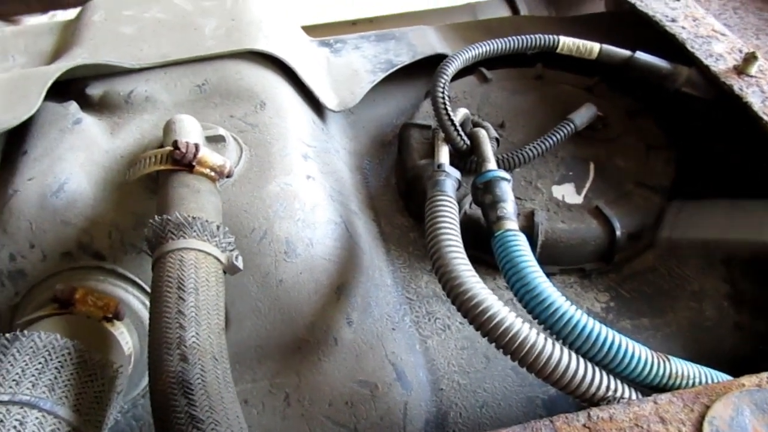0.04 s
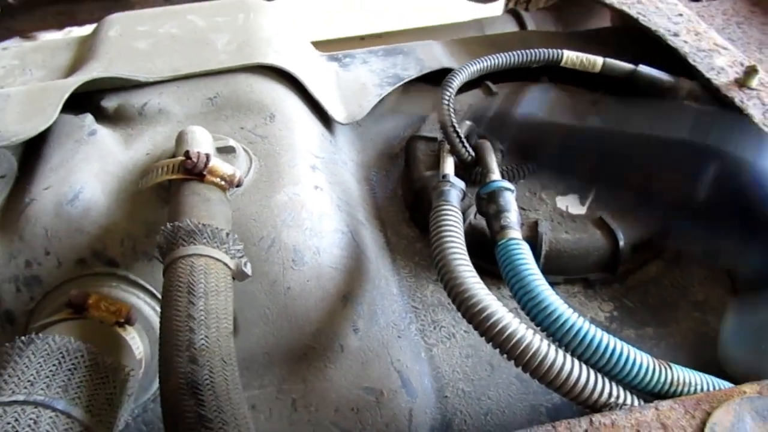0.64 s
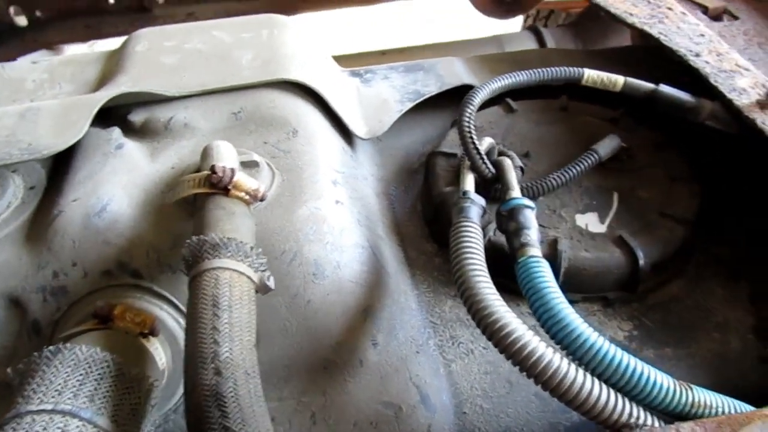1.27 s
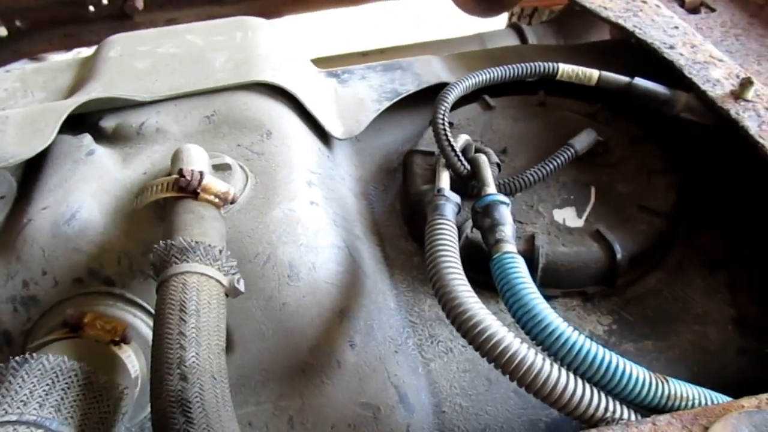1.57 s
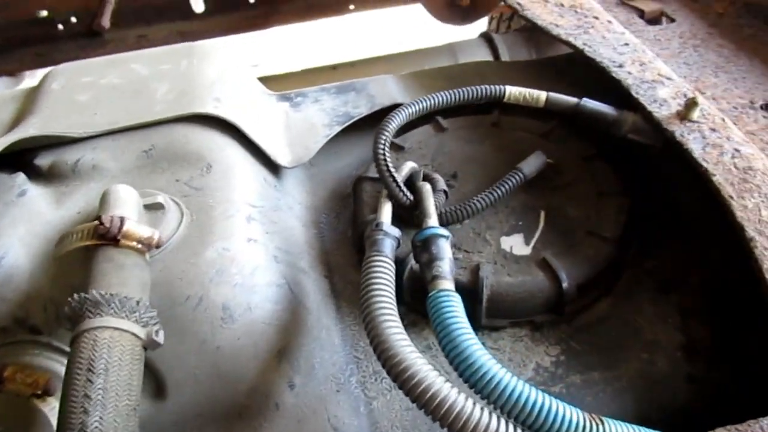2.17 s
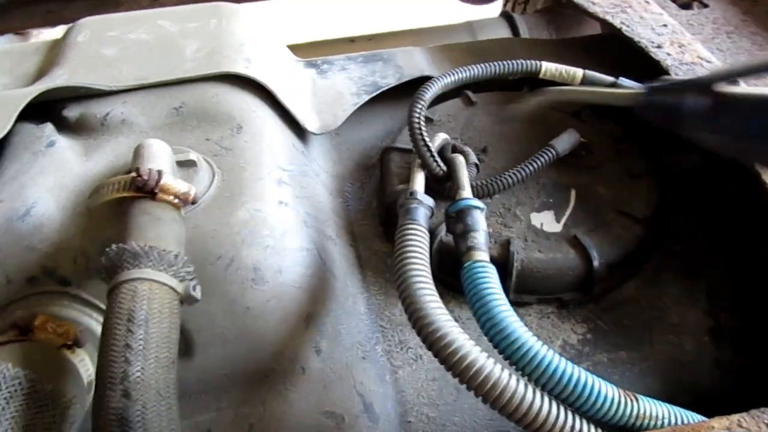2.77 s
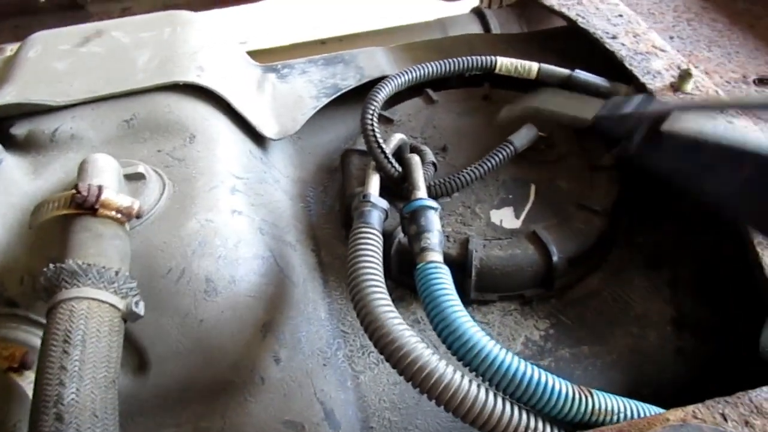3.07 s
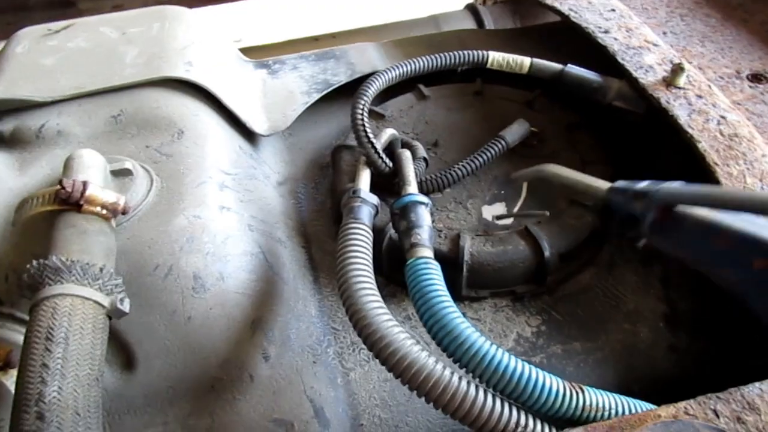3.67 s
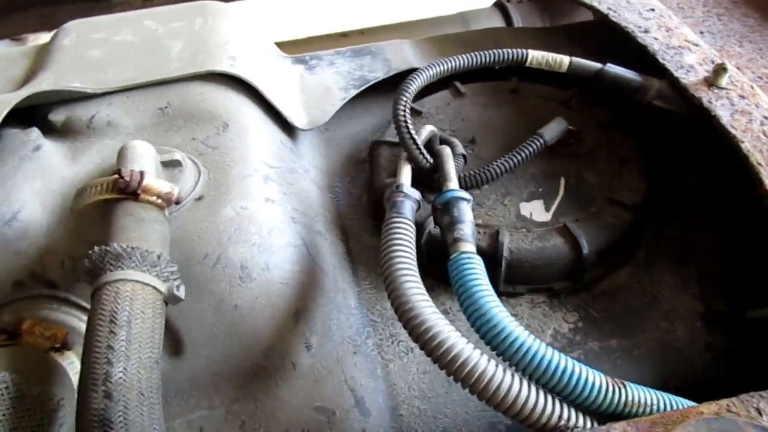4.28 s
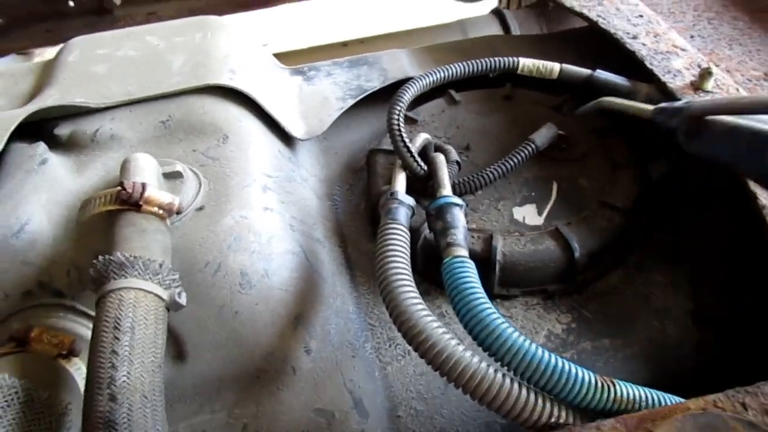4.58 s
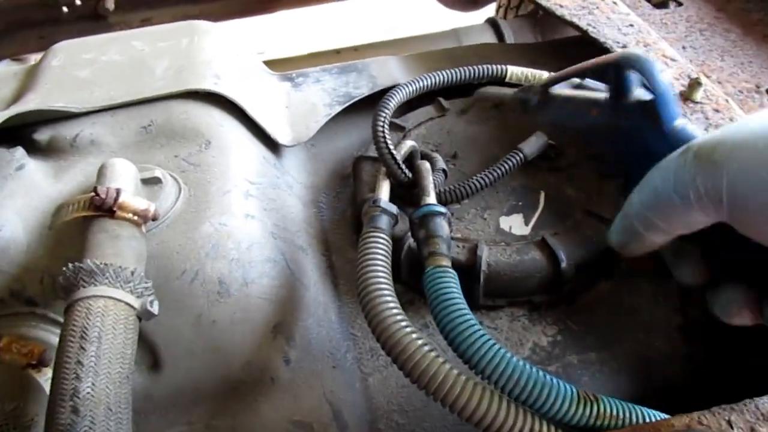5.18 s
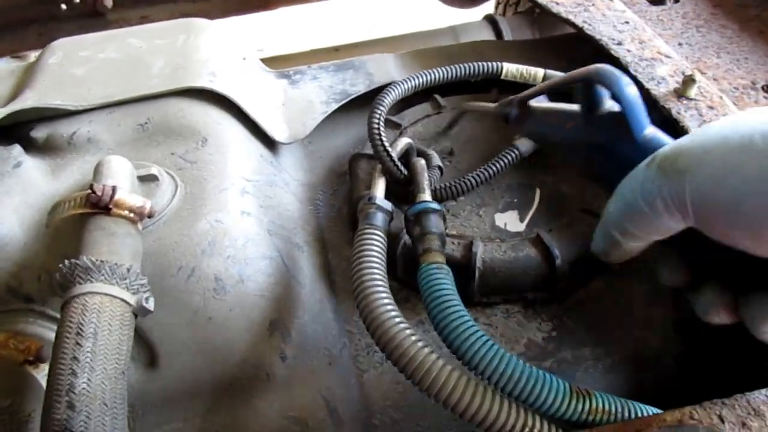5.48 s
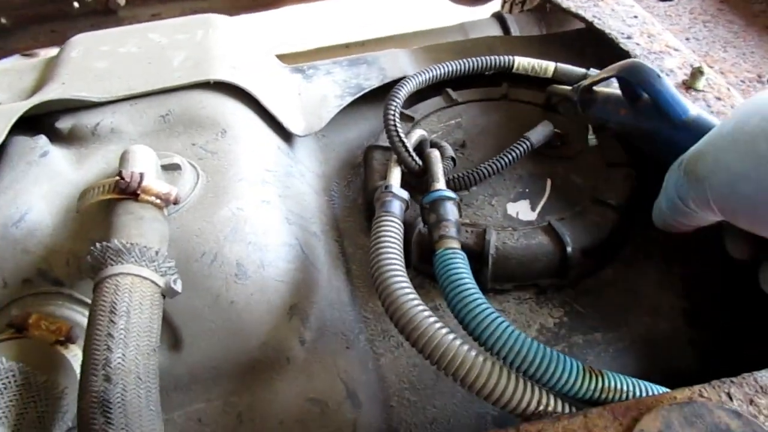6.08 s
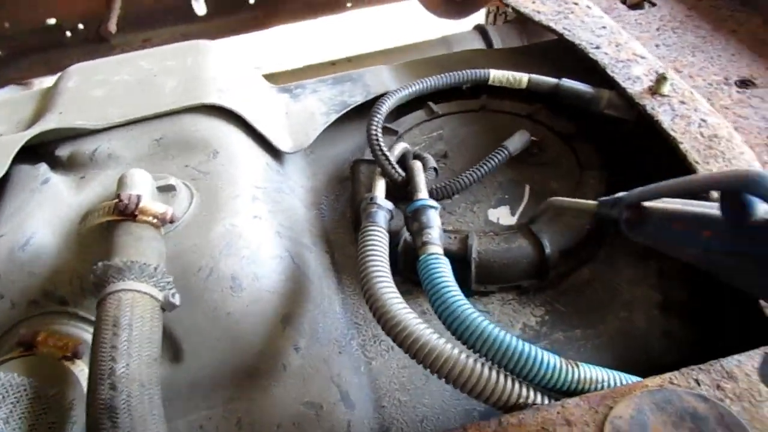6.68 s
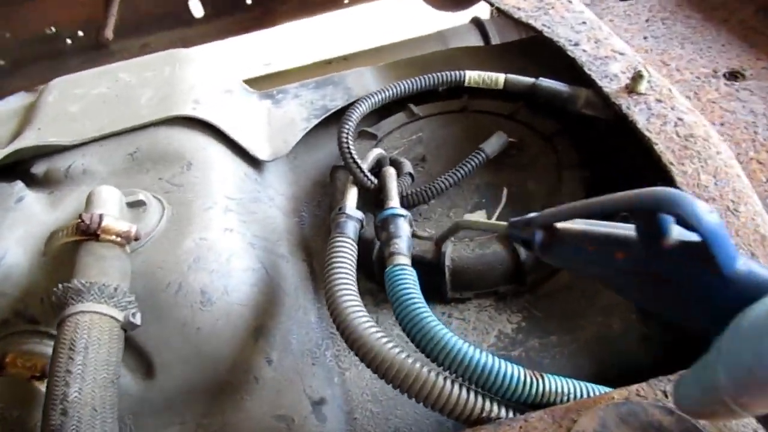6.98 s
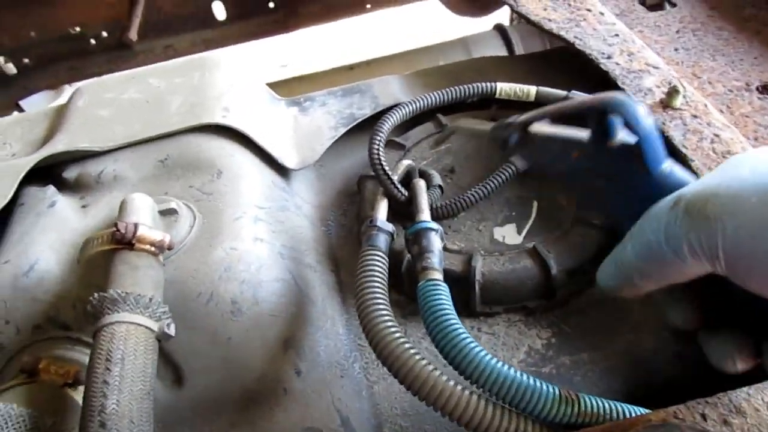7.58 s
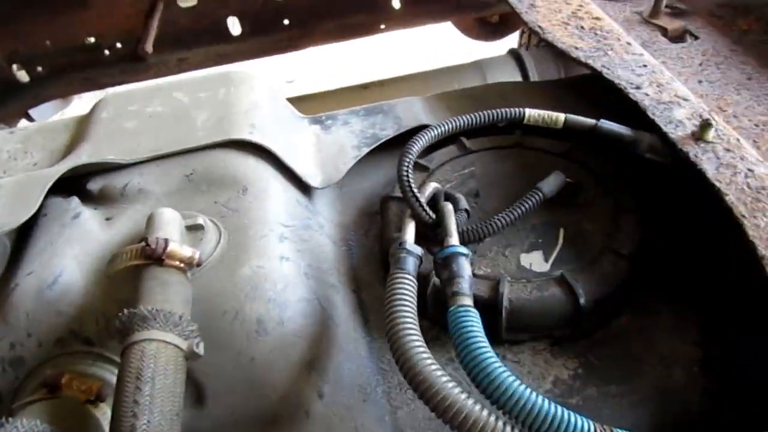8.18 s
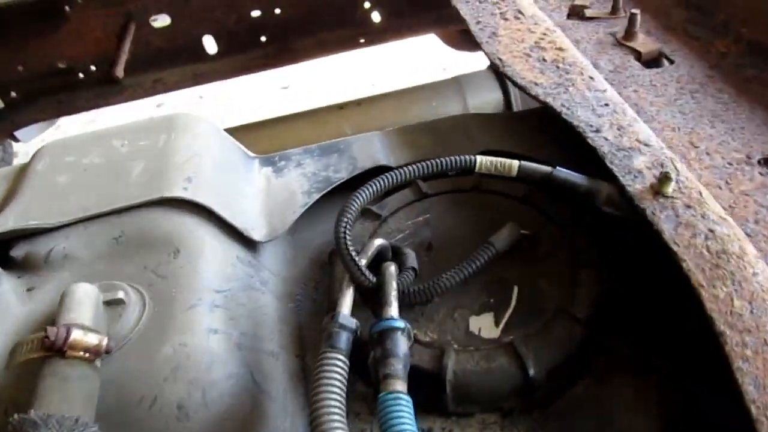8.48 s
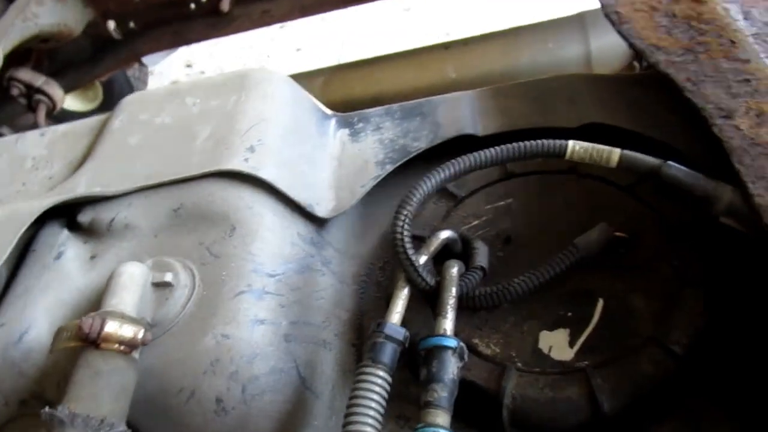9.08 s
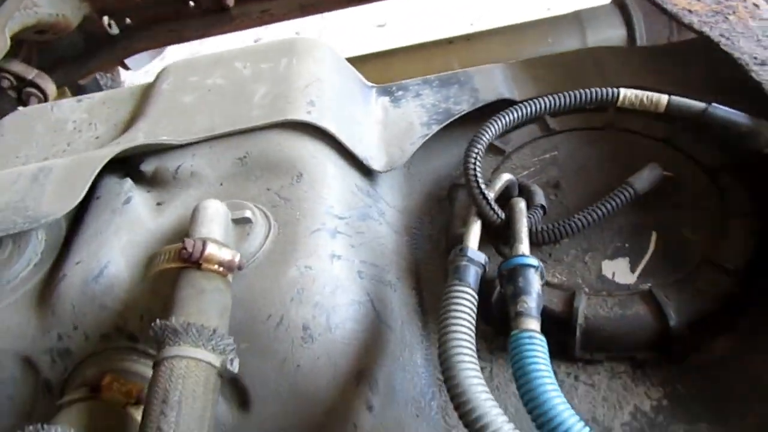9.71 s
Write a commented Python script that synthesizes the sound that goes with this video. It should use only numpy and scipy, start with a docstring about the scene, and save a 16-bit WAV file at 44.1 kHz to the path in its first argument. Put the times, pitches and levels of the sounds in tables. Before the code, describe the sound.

A compressed air blow gun cleans a fuel tank in a garage, close up and in mono. A brief spit of air opens, followed by full-bodied blasts from 0.2 to 1.2 seconds, 1.4 to 1.9, and 2.1 to 2.3. After a blink of silence, a brighter hiss runs from 2.4 to 4.2 seconds, fluttering quickly around 3.2 as the jet is shaken over a hose. The longest blast lasts from 4.3 to 8.6 seconds, wavering, flaring on edges and roaring in hollows, with surges near 8 seconds. Breathy howls come and go as air crosses openings, and loosened grit ticks faintly. Two short, sharp blasts follow between 8.7 and 9.3 seconds, and a last one from 9.5 to about 10. A few soft puffs of stray air touch the microphone. Each blast dies away quickly over a very faint low room rumble.

```python
"""Blow gun on a fuel tank

Compressed air cleans a tank top and its pump recess in a garage, close up and in mono: four blasts, a
blink of silence, then five from a second position. The jet hisses, splashes on the surface, roars in
hollows and buffets the tank. It flares on ribs and hoses, howls across openings and throws grit,
and each blast dies away in the room."""
import sys
import numpy as np
from scipy import signal
from scipy.fft import rfft, irfft, next_fast_len
from scipy.io import wavfile

SR = 44100
rng = np.random.default_rng(int(sys.argv[2]) if len(sys.argv) > 2 else 0)


def store_pcm(level_fs):
    """Save levels as 16-bit WAV."""
    pcm = np.round(np.clip(level_fs, -1, 1) * 32767).astype(np.int16)
    wavfile.write(sys.argv[1], SR, np.atleast_2d(pcm).T)


N = 434385
T = np.arange(N) / SR
FFT_SIZE = next_fast_len(N, True)
HZ = np.maximum(np.arange(FFT_SIZE // 2 + 1) * SR / FFT_SIZE, 1)

# trigger pulls: (valve opens [s], valve shuts [s], buffet [dB], roar [dB], splash [dB], hiss [dB])
TRIGGER_PULLS = [(-0.03, 0.039, -26.5, -19, -22, -17), (0.232, 1.244, -33, -26.5, -24, -21.5),
                 (1.441, 1.879, -38, -39, -29, -20), (2.064, 2.287, -29.5, -25.5, -25, -20.5),
                 (2.365, 4.203, -46.5, -40.5, -29, -24.5), (4.301, 8.585, -49.5, -42, -33.0, -26),
                 (8.675, 8.909, -48, -40.5, -29.5, -29), (8.947, 9.271, -48, -44.5, -34.5, -31.5),
                 (9.514, 9.984, -47, -35.5, -26.5, -25.5)]
BUFFET_PER_ROAR = 0.49  # dB of buffeting gained for each dB of roar


def undb(db):
    """Decibels to gain."""
    return 10 ** (np.asarray(db) / 20)


def unit(x):
    """Scale to an rms of one."""
    return x / np.sqrt(np.mean(x ** 2))


def colour(points, bells=()):
    """An EQ curve with resonant peaks and dips on top, as a gain for each frequency."""
    hz, db = np.transpose(points)
    curve_db = np.interp(np.log(HZ), np.log(hz), db)
    bells_db = sum(peak / (1 + (2 * (HZ - centre) / width) ** 2) for centre, width, peak in bells)
    return undb(curve_db + bells_db)


def noise(gain):
    """Noise shaped by a gain for each frequency, at unit rms."""
    spectrum = rng.standard_normal(2 * len(HZ)).view(complex)
    return unit(irfft(spectrum * gain, FFT_SIZE)[:N])


def wander(rate_hz):
    """Smooth random motion of unit spread, up to about rate_hz."""
    spectrum = np.fft.fft(rng.standard_normal(4096))
    hz = np.fft.fftfreq(len(spectrum), T[-1] / len(spectrum))
    slow = np.fft.ifft(spectrum / (1 + (hz / rate_hz) ** 4)).real
    return np.interp(T, np.linspace(0, T[-1], len(slow)), unit(slow))


def swell(at, length):
    """A rounded envelope centred on a moment, one at its top."""
    distance = np.abs(2 * (T - at) / length)
    near = distance < 2
    bump = np.zeros(N)
    bump[near] = np.exp(-distance[near] ** 3)
    return bump


def valve(opening_s, closing_s):
    """Air flow builds as the trigger is squeezed and drains from the nozzle on release."""
    flow = np.zeros(N)
    for opens, shuts, *_ in TRIGGER_PULLS:
        attack = 1 - np.exp(-(np.maximum(T - opens, 0) / opening_s) ** 2)
        release = np.exp(-np.clip((T - shuts) / closing_s, 0, 20))
        flow += attack * release
    return flow


def blast_levels():
    """Buffet, roar, splash and hiss in dB: each blast has its own balance, and the long ones drift."""
    # level rides, one curve for each long blast: (time [s], roar [dB], splash [dB], hiss [dB])
    drifts = [
        [(0.322, 3.5, 1.5, 4), (0.431, -1.5, 0.5, 5), (0.521, 11.5, 2.0, -1.5), (0.756, -4, -4, 2.5),
         (0.875, 3.5, -0.5, -2), (1.056, -2, 1, 5), (1.256, -3.0, -3, -2.5)],
        [(2.392, 2, 2.5, 1), (2.476, 2.5, 0.5, 0.5), (2.511, 9, 8, -5), (2.816, -1, -2.5, -1.5),
         (3.25, 2.5, 3.0, 3), (3.361, -6.5, -4, 1.0), (3.722, -2, -4, 5.5), (3.827, 2, -4.5, 2),
         (4.215, -6, -6, 1.5)],
        [(4.337, -6.5, -2, 0.5), (4.579, 3.5, 0, 5.5), (4.814, 5.0, 1, -2.0), (5.013, 5.5, 4.5, 4.0),
         (5.294, 1.5, -2.5, -2.5), (5.448, 8.5, 5, -2.5), (6.103, 8, 1.5, 2.0), (6.607, -6.5, -6.0, -5),
         (6.813, -2.5, 0, 6), (6.881, -5.5, -3.5, 1.5), (7.209, -7.5, 1.0, 1), (7.325, -14, -8, 5),
         (7.654, 2.5, 6, 2.5), (7.884, 0.5, -2.5, -8), (8.528, 4, 0.5, -3.5)],
    ]
    pulls = np.array(TRIGGER_PULLS)
    current_pull = np.searchsorted(pulls[1:, 0], T)
    levels = pulls[current_pull, 2:].T
    for curve in drifts:
        times, *rides = np.transpose(curve)
        during = current_pull == np.searchsorted(pulls[1:, 0], times.mean())
        roar, splash, hiss = (np.interp(T[during], times, ride) for ride in rides)
        levels[:, during] += [BUFFET_PER_ROAR * roar, roar, splash, hiss]
    return levels


def aim(roar_per_splash=0.38, splash_per_roar=0.47, tremor_hz=11, tremor_db=1.0):
    """Swings in dB as the jet roams: edges make it splash and hiss, hollows make it roar and buffet."""
    # the jet flares on a rib or hose, or misses the surface and dips:
    # (centre [s], length [s], splash rise [dB], hiss rise [dB])
    edges = [(0.31, 0.05, 1, 1.5), (0.8, 0.033, 11.5, 1.5), (1.192, 0.032, 12, 3.5), (2.463, 0.042, 3, 5.5),
             (2.672, 0.068, 5, 3.5), (2.783, 0.016, 10, 13), (2.824, 0.014, -1, 11), (2.85, 0.014, 4, 5.0),
             (2.887, 0.023, 6.5, 8.5), (2.922, 0.018, 3.5, 5), (2.993, 0.032, -4, 7),
             (3.034, 0.018, 5.5, 7), (3.351, 0.032, -2, 11.5), (3.477, 0.098, 7, 1.5), (3.65, 0.041, -1, 2),
             (3.746, 0.032, 2, 4.5), (4.165, 0.042, -2, 3.0), (4.381, 0.098, 10, 0.5),
             (4.495, 0.015, 3.5, 10), (5.01, 0.045, 4.5, 1.0), (5.103, 0.034, 2.5, 1.0),
             (5.465, 0.036, 3, -2), (5.57, 0.04, 0, 3), (5.71, 0.036, -5, -1), (6.545, 0.026, 0.5, 5),
             (6.97, 0.02, -1.5, -4.0), (7.11, 0.035, -6, -4), (7.274, 0.058, 3.5, 3.5),
             (7.39, 0.043, 8.5, 3.5), (7.53, 0.051, 0.5, 6.5), (7.764, 0.063, 2, 12), (7.9, 0.057, 6, -3),
             (7.997, 0.044, 11.5, 3), (8.116, 0.045, 12.0, 2), (8.158, 0.058, 3, 6), (8.32, 0.035, -5, -4),
             (8.885, 0.21, 2.5, 8), (9.037, 0.13, 11, 13), (9.165, 0.079, 14.0, 16.5), (9.53, 0.02, 5.5, 3),
             (9.606, 0.042, 5.5, 10), (9.642, 0.018, -9, -5.0), (9.655, 0.011, 4.5, 3),
             (9.707, 0.15, 5.0, 3.5)]
    # the jet dips into a hollow: (centre [s], length [s], roar rise [dB])
    hollows = [(1.005, 0.055, 4), (1.5, 0.13, 17), (1.843, 0.085, 14.5), (2.144, 0.065, 6.5),
               (2.714, 0.065, 9.5), (2.833, 0.072, 13.5), (2.99, 0.041, 14), (3.07, 0.053, 7.5),
               (3.359, 0.05, 9), (3.581, 0.057, 12), (4.027, 0.14, 8.0), (4.484, 0.12, 10.5),
               (4.822, 0.065, 2.5), (5.336, 0.064, 5.5), (5.779, 0.05, 3.5), (5.958, 0.045, 4),
               (6.091, 0.07, 2), (6.562, 0.068, 10), (6.866, 0.012, 10.5), (7.029, 0.056, 7.5),
               (7.336, 0.068, 18), (8.02, 0.07, 11), (8.108, 0.062, 14.5), (8.167, 0.053, 18),
               (9.233, 0.09, 6), (9.532, 0.038, 8.5)]
    roar, splash, hiss = shake()
    for at, length, splash_db, hiss_db in edges:
        on_edge = swell(at, length)
        roar += roar_per_splash * splash_db * on_edge
        splash += splash_db * on_edge
        hiss += hiss_db * on_edge
    hollow_db = sum(rise_db * swell(at, length) for at, length, rise_db in hollows)
    hollow_db += tremor_db * wander(tremor_hz)  # the unsteady hand makes the roar waver
    roar += hollow_db
    splash += splash_per_roar * hollow_db
    return np.array([BUFFET_PER_ROAR * roar, roar, splash, hiss])


def eddy_bands(crossovers_hz=(650, 2100, 7500)):
    """Shares of the spectrum for four sizes of eddy, largest first; their powers add to one."""
    below = [1 / (1 + (HZ / hz) ** order) for hz, order in zip(crossovers_hz, (12, 10, 8))]
    powers = np.diff([np.zeros_like(HZ), *below, np.ones_like(HZ)], axis=0)
    return np.sqrt(np.abs(powers))


def turbulence(gain, lag, flutter_db, flutter_hz, reflection=0.22):
    """Eddies come in uneven gusts and are heard again, lag samples later, off the tank."""
    eddies = noise(gain)
    reflected = eddies[np.arange(N) - np.round(lag).astype(int)]
    gusts = undb(flutter_db * wander(flutter_hz))
    return unit((eddies + reflection * reflected) * gusts)


def grit(gain, per_second=45, scatter_db=4, low_cut_hz=1800):
    """Loosened dirt ticks against the tank: many faint grains, a few sharp ones."""
    hits = rng.random(N) < per_second / SR
    sizes = undb(scatter_db * np.minimum(rng.exponential(size=N), 3.5))
    spectrum = rfft(hits * sizes, FFT_SIZE) * gain * HZ / (HZ + low_cut_hz)
    return unit(irfft(spectrum, FFT_SIZE)[:N])


def jet(levels, gain, trim_db, grit_db, sputter_db, bounce_s=0.0006, sway=0.16):
    """Large eddies buffet the tank, middling ones stir its hollows, small ones splash and hiss."""
    large, middling, small, finest = eddy_bands() * gain
    lag = SR * bounce_s * np.exp(sway * wander(rate_hz=3.5))  # the bounce shifts as the hand sways
    sputter = unit(undb(sputter_db * wander(rate_hz=38)))  # shifting contact with the uneven surface
    buffet = turbulence(large, lag, flutter_db=0.9, flutter_hz=45)
    roar = turbulence(middling, lag, flutter_db=1.8, flutter_hz=35.2)
    splash = turbulence(small, lag, flutter_db=1.04, flutter_hz=45.2) + undb(grit_db) * grit(gain)
    hiss = turbulence(finest, lag, flutter_db=1.22, flutter_hz=45)
    layers = [sputter * buffet, sputter * roar, sputter * splash, hiss]
    faders = undb(levels + np.array(trim_db)[:, None])
    return np.sum(faders * layers, axis=0)


def room(x, wet_db, t60_s, treble_t60_s, crossover_hz=7000):
    """Diffuse echoes off the car body and the garage; the treble has its own decay time."""
    t = T[:SR // 2]
    echoes = rng.standard_normal(len(t))
    low = signal.sosfiltfilt(signal.butter(1, crossover_hz, fs=SR, output="sos"), echoes)
    treble = echoes - low
    tail = low * undb(-60 * t / t60_s) + 0.41 * treble * undb(-60 * t / treble_t60_s)
    tail *= t > 0.004  # pre-delay
    tail /= np.sqrt(np.sum(tail ** 2))
    return x + undb(wet_db) * signal.fftconvolve(x, tail)[:N]


def garage_tone(level_db=-60.5):
    """The quiet garage: a steady low rumble with a faint hiss."""
    # room tone spectrum: (frequency [Hz], level [dB])
    spectrum = [(40, -4), (100, 2.5), (360, -4.5), (550, -12.5), (1000, -9), (1750, -27), (3000, -13),
                (5500, -15.5), (9000, -16), (11300, -33.5), (14500, -24)]
    return undb(level_db) * noise(colour(spectrum))


def howls():
    """Openings in the pump recess ring breathily while the jet lies across them."""
    # passes over an opening: (centre [s], length [s], pitch [Hz], bandwidth [Hz], level [dB])
    openings = [(0.345, 0.084, 1200.0, 360.0, -23), (0.465, 0.045, 2190.0, 700.0, -20),
                (0.52, 0.13, 539, 420, -19), (0.538, 0.12, 1890, 450.0, -27),
                (0.888, 0.062, 420.0, 320.0, -22), (0.89, 0.067, 1096, 700, -26.5),
                (1.719, 0.15, 330.0, 240.0, -26), (1.743, 0.17, 160.5, 100.0, -29),
                (2.142, 0.077, 1298, 420.0, -19), (2.541, 0.094, 2660, 1000, -21.5),
                (2.666, 0.098, 2576.0, 850, -24), (3.483, 0.064, 6520, 500.0, -27),
                (5.298, 0.85, 5170, 700.0, -37.5), (6.572, 0.028, 720, 600, -36),
                (7.66, 0.089, 4980, 1000.0, -28.5), (8.173, 0.019, 2294, 2000.0, -21.5),
                (8.299, 0.22, 761, 620.0, -30.0), (8.467, 0.057, 934, 524, -24.5),
                (9.545, 0.048, 1554, 350, -32), (9.836, 0.025, 3800.0, 180.0, -26.5)]
    out = np.zeros(N)
    for at, length, hz, width, db in openings:
        envelope = swell(at, length)
        on = envelope > 0
        # turbulence stirs the size and phase of the ring; a leakier opening rings in a wider band
        leak = signal.butter(4, width / 2, fs=SR, output="sos")
        stir = signal.sosfilt(leak, rng.standard_normal((2, 2 * SR)))[:, -on.sum():]
        phase = 2 * np.pi * hz * T[on]
        ring = unit(stir[0] * np.cos(phase) + stir[1] * np.sin(phase))
        out[on] += undb(db) * envelope[on] * ring
    return out


def shake(centre_s=3.202, length_s=0.34, rate_hz=10.6, abruptness=2.4):
    """The gun is shaken to and fro: the jet hisses on a hose and roars in the hollow beside it."""
    swing_db = (-6.5, 1.5, 7.5)  # roar, splash and hiss with the jet on the hose
    on_hose = np.tanh(abruptness * np.cos(2 * np.pi * rate_hz * (T - centre_s)))
    return np.outer(swing_db, on_hose * swell(centre_s, length_s))


def puffs(corner_hz=150):
    """Stray air thrown back from the tank hits the microphone in soft, low thuds."""
    # puffs of air: (centre [s], length [s], level [dB])
    gusts = [(3.5, 0.068, -50), (5.586, 0.028, -50), (5.953, 0.11, -52), (6.857, .024, -43),
             (9.15, 0.045, -46), (9.584, .06, -45), (9.684, 0.054, -50)]
    thud = noise(HZ / (1 + (HZ / corner_hz) ** 3))
    return thud * sum(undb(db) * swell(at, length) for at, length, db in gusts)


def scene():
    """The gun from two positions, one after the other, over the quiet garage."""
    # tone of the rushing air, full-bodied at first, then brighter: (frequency [Hz], level [dB])
    full_air = [(40.0, -17), (100.0, -9.5), (250.0, -4), (600.0, -1), (1200.0, -1.5), (2500.0, -2),
                (4500.0, -5.5), (7000.0, -5), (10000.0, -6.5), (13500.0, -8.5), (15700.0, -14)]
    bright_air = [(40.0, -37), (100.0, -29), (250.0, -16.5), (600.0, -10), (1200.0, -11), (2500.0, -0.5),
                  (4500.0, 1.5), (7000.0, 0), (10000.0, 0.7), (13500.0, 3), (15700.0, 1.5)]
    # peaks and deep notches in the sound at each position: # (frequency [Hz], width [Hz], gain [dB])
    first_colour = [(148.5, 44.1, 1), (457, 115, 6.5), (817, 230, -10), (1359.8, 152.0, -0.5),
                    (1830, 240, -1.8), (3070, 510, -5), (3903.2, 400, 3), (4804, 500, -17),
                    (6700, 280.0, 0)]
    second_colour = [(764, 53, 6), (893, 41, -4), (1087, 400, 6.5), (1550, 71, 2.5), (1950, 710, -13.5),
                     (3313, 600, 8), (3415, 630, -7.5), (5400, 150, 4), (7280, 660, -3.5),
                     (9150, 1040, 3.5), (11350, 1060, -15.5)]
    silence_from_s, silence_to_s = 2.363, 2.379
    levels = blast_levels() + aim()
    howl = howls()
    first = jet(levels, colour(full_air, first_colour),
                trim_db=[-0.22, -0.2, -0.2, 0.22], grit_db=-20.0, sputter_db=-0.2)
    second = jet(levels, colour(bright_air, second_colour),
                 trim_db=[0.4, 0.28, -0.0083, 0.35], grit_db=-17.5, sputter_db=1.07)
    first = (first + howl) * valve(opening_s=0.025, closing_s=0.011)
    second = (second + howl) * valve(opening_s=0.016, closing_s=0.011)
    first = room(first, wet_db=-14, t60_s=0.53, treble_t60_s=0.46)
    second = room(second, wet_db=-13, t60_s=0.19, treble_t60_s=0.25)
    garage = garage_tone()
    mono = (first + garage) * (T < silence_from_s) + (second + puffs() + garage) * (T > silence_to_s)
    return np.array([mono, mono])


def record(dry):
    """A steep low-pass takes the very top off the hiss."""
    cutoff_hz = 15850
    return signal.sosfilt(signal.ellip(12, 0.1, 80, cutoff_hz, fs=SR, output="sos"), dry)


dry = scene()
out = record(dry)
store_pcm(out)
```